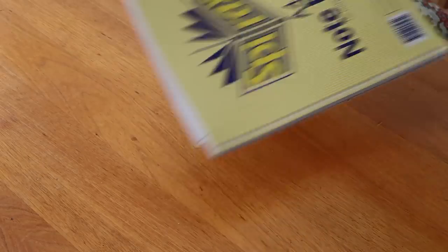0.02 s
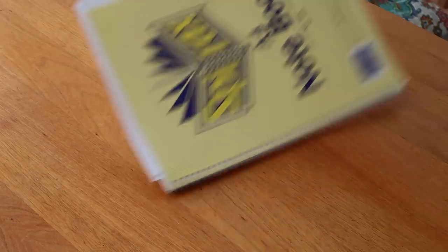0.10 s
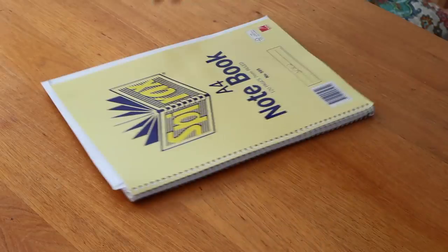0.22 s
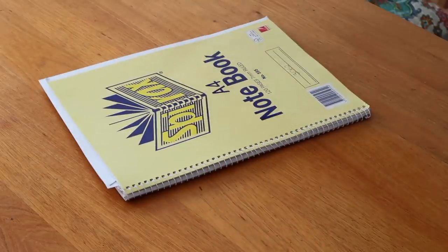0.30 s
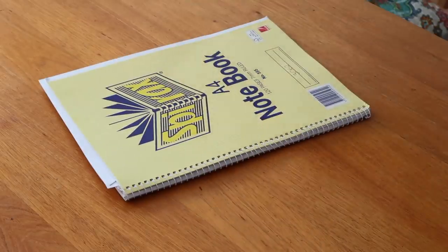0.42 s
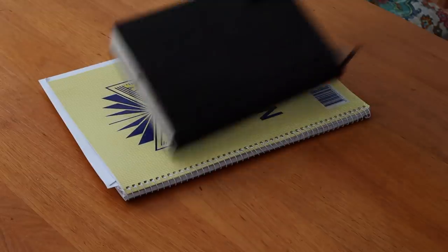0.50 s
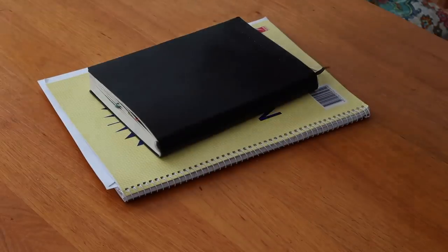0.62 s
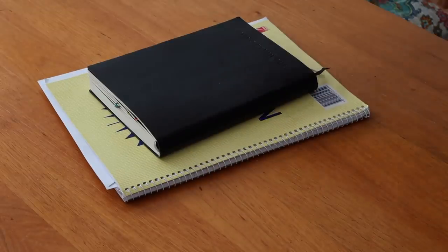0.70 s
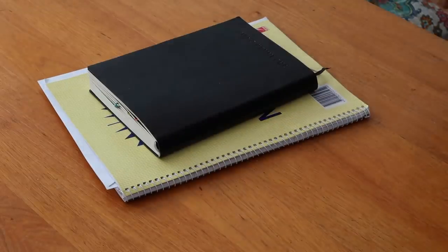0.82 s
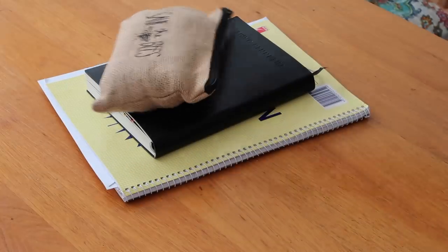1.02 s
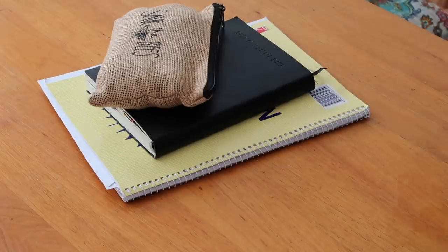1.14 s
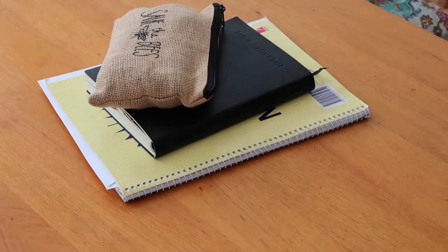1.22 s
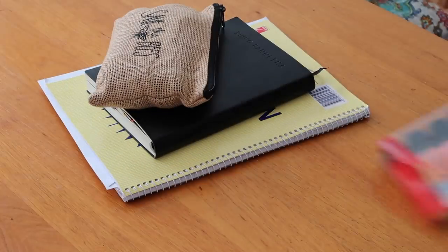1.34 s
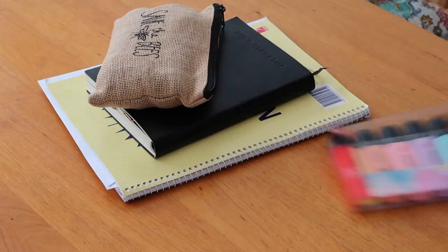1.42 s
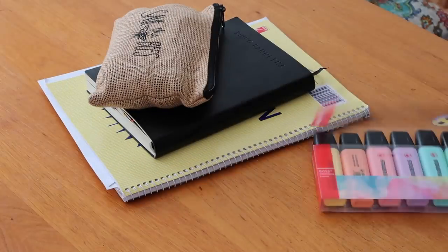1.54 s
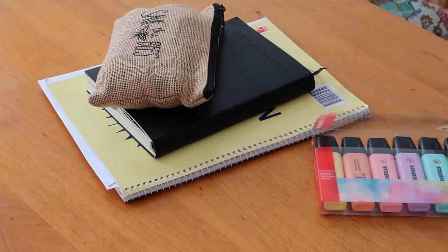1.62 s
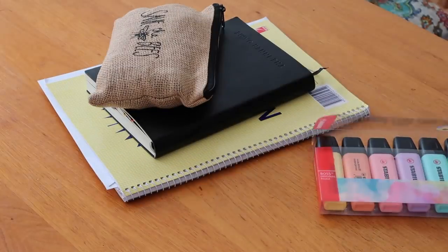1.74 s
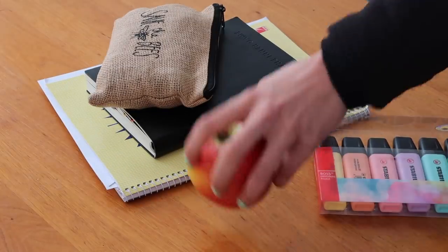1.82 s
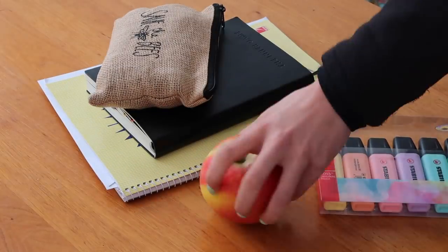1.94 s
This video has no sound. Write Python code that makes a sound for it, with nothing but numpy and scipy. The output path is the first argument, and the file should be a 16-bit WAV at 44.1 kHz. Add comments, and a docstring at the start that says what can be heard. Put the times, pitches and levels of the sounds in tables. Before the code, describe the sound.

A notebook slaps, a hard book thuds, a pencil case rattles and plastic markers clatter on wood

```python
"""Over faint hush and a low hum, a hand rustles, pages flutter and a notebook slaps a wooden table.
A hard-cover book, a cloth pencil case and a plastic pack of markers land next, in a bare, lively room.
Contacts are clicks and noise coloured by the object; knocks and the table top are fading sine waves.
Each landing is its own shot: a hard cut ends its echo, made of sparse clicks that die away.
A close pair of microphone ports hears it nearly mono in the bass and wide in the treble."""
import sys
import numpy as np
from scipy import signal
from scipy.fft import rfft, irfft
from scipy.io import wavfile

SR = 44100
rng = np.random.default_rng(int(sys.argv[2]) if len(sys.argv) > 2 else 0)


def to_wav(s):
    """Save 16-bit WAV."""
    ch = np.atleast_2d(s).T  # columns
    pcm = np.round(np.clip(ch, -1, 1) * 32767)  # PCM
    wavfile.write(sys.argv[1], SR, pcm.astype(np.int16))


N = 85995
TIME = np.arange(N) / SR  # seconds

# In every contact table t is the moment the rise ends and the fall begins.
# Each object's sound function returns its direct sound and its level into the room (dB).

# Fluttering pages, then the swell that leads into the slap: t/s, level/dB, rise/s, fall by 60 dB/s
PAGE_FLUTTER = [(.183, -38, 0.0068, 0.092), (.200, -22.5, 0.036, 0.084), (.222, -25.5, .005, 0.051),
                (.272, -19.5, 0.011, 0.023)]
# Colour of the pages: f/Hz, relative level/dB
PAGE_COLOUR = [(59, -30), (100, -22), (438, -1.5), (668, -9.5), (1430, -12), (1660, -15), (3120, -14.5),
               (3540, -19), (4660, -25), (15500, -50.5)]


def notebook_pages():
    """Loose sheets brush each other in soft, grainy bursts, and a duller swell leads into the slap."""
    return contacts(PAGE_FLUTTER, PAGE_COLOUR), -2.5


# Notebook hitting the table: t/s, level/dB, rise/s, fall by 60 dB/s
NOTEBOOK_SLAP = [(.275, -19, 0.0048, 0.06), (.2775, -11, 0.0026, 0.017), (.290, -13.5, 0.0093, 0.073)]
# Colour of the slap: f/Hz, relative level/dB
SLAP_COLOUR = [(200, -40), (450, -9.5), (850, -12.5), (1300, -6.5), (1800, -1.5), (2800, -12.5),
               (5500, -18), (8000, -23.5), (15500, -47.5)]


def notebook_slap():
    """The flat notebook meets the wood in quick bursts, strongest in the middle pitches."""
    return contacts(NOTEBOOK_SLAP, SLAP_COLOUR), -4


# Hard cover touching down: t/s, level/dB, rise/s, fall by 60 dB/s
COVER_TAPS = [(.5945, -28, 0.003, 0.024), (.598, -14.5, 0.00059, 0.038), (.608, -18, 0.009, 0.13),
              (.636, -20, 0.0068, 0.088)]
# Colour of the cover: f/Hz, relative level/dB
COVER_COLOUR = [(200, -25), (350, 1), (750, 6), (1500, -3.5), (3500, -11.5), (5000, -16.5), (6500, -28),
                (12700, -35.5), (15500, -49)]


def book_cover():
    """The stiff cover taps the table several times with a boxy sound."""
    return contacts(COVER_TAPS, COVER_COLOUR), -10


# Pencils rattling in the case: t/s, level/dB, rise/s, fall by 60 dB/s
PENCIL_RATTLE = [(.995, -17, 0.0081, .04), (1.001, -12, 0.0026, 0.035), (1.010, -10.5, 0.00069, 0.07),
                 (1.013, -11.5, 0.00077, 0.052), (1.043, -20.5, 0.0024, 0.12), (1.183, -29, 0.001, 0.13)]
# Colour of the pencils: f/Hz, relative level/dB
PENCIL_COLOUR = [(150, -50.5), (250, -6.5), (353, -23.5), (450, -3.5), (516, -17), (658, -15.5),
                 (978, -22.5), (1220, -15.5), (2360, -6.5), (13000, -30), (15500, -39)]


def pencil_rattle():
    """Pencils inside the cloth knock together in overlapping bursts."""
    return contacts(PENCIL_RATTLE, PENCIL_COLOUR), -4.5


# Zip of the pencil case: t/s, level/dB, rise/s, fall by 60 dB/s
ZIP_TICK = [(1.009, -12, 0.00047, 0.0084)]
# Colour of the zip: f/Hz, relative level/dB
ZIP_COLOUR = [(3000, -15), (5000, 4), (7000, -14), (10000, 3), (12500, -6), (15500, -29)]


def zip_tick():
    """The small zip gives one very short, bright tick."""
    return contacts(ZIP_TICK, ZIP_COLOUR), -3


# Edge of the marker pack: t/s, level/dB, rise/s, fall by 60 dB/s
PACK_EDGE = [(1.3885, -15.5, 0.00028, 0.062), (1.406, -19.5, .010, 0.16), (1.510, -27, 0.12, 0.068)]
# Colour of the edge: f/Hz, relative level/dB
EDGE_COLOUR = [(200, -44), (400, -10.5), (800, -6.5), (1300, -3), (1600, -2), (2300, -5.5), (3500, -19),
               (5500, -26), (12500, -48), (15500, -53)]


def pack_edge():
    """The plastic edge touches down first, with a sharp start."""
    return contacts(PACK_EDGE, EDGE_COLOUR), -3


# Pack landing flat: t/s, level/dB, rise/s, fall by 60 dB/s
PACK_FLAT = [(1.523, -10.5, 0.0019, 0.033), (1.535, -16.5, 0.0047, 0.12), (1.555, -16.5, 0.0049, 0.018)]
# Colour of the flat side: f/Hz, relative level/dB
FLAT_COLOUR = [(120, -36), (300, -6), (480, -1), (700, -0.5), (900, -9.5), (1300, -10), (2700, -21),
               (5000, -27), (9000, -66)]


def pack_flat():
    """The broad side of the pack lands with a duller sound than its edge."""
    return contacts(PACK_FLAT, FLAT_COLOUR), 0


# Markers rattling in the pack: t/s, level/dB, rise/s, fall by 60 dB/s
MARKER_RATTLE = [(1.515, -17.5, 0.0085, 0.033), (1.526, -15.5, 0.0013, 0.04), (1.576, -19, 0.032, 0.053),
                 (1.615, -28.5, 0.0097, 0.11), (1.80, -44.5, 0.24, 0.14)]
# Colour of the markers: f/Hz, relative level/dB
MARKER_COLOUR = [(600, -0.5), (1500, -1.5), (2500, -1.5), (4000, -13), (5500, -16), (7000, -23.5),
                 (15000, -39)]


def marker_rattle():
    """Loose markers clatter against each other inside the plastic."""
    return contacts(MARKER_RATTLE, MARKER_COLOUR), -1


# Short pitched knocks: t/s, starting level/dB, f/Hz, fall by 60 dB/s
KNOCKS = [(.2765, 6, 2300, 0.0063), (0.2774, -10.5, 1143, 0.028), (0.279, -8.5, 5480, 0.0047),
          (.2770, -29, 7950, 0.0026), (0.599, -10, 885, 0.0074), (0.6345, -4.5, 1290, 0.0054),
          (0.999, -14, 1884, 0.013), (1.010, -7.5, 2453, 0.021), (1.178, -21.5, 2730, .03),
          (1.388, -3.5, 1550, 0.0059), (1.39, -19.5, 4700, 0.007), (1.5216, -4, 4150, 0.0022),
          (1.5212, -10, 5100, 0.0051), (1.5206, -11, 5830, 0.0069), (1.522, -7, 605, 0.04),
          (1.526, -6, 873, 0.018)]


def knocks():
    """A struck cover, pencil or plastic wall rings briefly as a fading sine wave."""
    rise_s = 0.00017
    sound = np.zeros(N)
    for start, level_db, hz, t60 in KNOCKS:
        age = np.maximum(TIME - start, 0)
        loudness = gain_of(level_db - 60 * age / t60) * (1 - np.exp(-age / rise_s))
        sound -= loudness * np.sin(2 * np.pi * hz * age)
    return sound, -10


# Weight landing on the table top: t/s, level/dB, contact time/s
PUSHES = [(.200, -22, 0.0028), (0.282, -24, 0.0061), (.598, -14, 0.0032), (0.606, -12.5, 0.0014),
          (.615, -12.5, 0.0061), (.638, 1, 0.0034), (0.647, -9.5, 0.0025), (.6485, -12.5, 0.0025),
          (0.6517, -13, 0.0034), (.995, -15, 0.0015), (1.024, -15, 0.0035), (1.524, -19.5, 0.001),
          (1.571, -21.5, 0.0027)]
# Ringing modes of the table: f/Hz, relative level/dB, fall by 60 dB/s
TABLE_MODES = [(113, 4, 0.28), (264, -7.5, 0.35), (420, 0, 0.57), (448, 8.5, 0.21), (564, -33, 0.22),
               (620, -26, 0.47), (716, -29, 0.54), (759, -32, 0.54), (131.9, -6.5, 0.33),
               (222, -25.5, 0.21)]


def table_top():
    """A smooth force pulse gives a low pressure swing and rings the table's modes."""
    ring_db = -17
    force, swing = np.zeros(N), np.zeros(N)
    for start, level_db, contact_s in PUSHES:
        u = (TIME - start) / (contact_s / 2)
        pulse = gain_of(level_db) * np.exp(-2 * u ** 2)
        force += pulse / (contact_s * SR / 2)  # a longer push is spread thinner
        swing += pulse * (4 * u ** 2 - 1)  # the curvature of the force pulse
    age = np.arange(SR // 2) / SR
    ring = np.zeros(len(age))
    for hz, level_db, t60 in TABLE_MODES:
        ring += gain_of(level_db - 60 * age / t60) * np.sin(2 * np.pi * hz * age)
    return swing + gain_of(ring_db) * signal.oaconvolve(force, ring)[:N], -8


# Rustling hand: t/s, level/dB, rise/s, fall by 60 dB/s
HAND_RUSTLE = [(.137, -41.5, .001, 0.32), (.801, -44, 0.0042, 0.13), (.932, -46, 0.003, 0.2),
               (.961, -35.5, 0.0076, 0.05), (1.336, -34.5, 0.00084, 0.11), (1.878, -49, 0.0021, 0.064)]
# Colour of the rustle: f/Hz, relative level/dB
RUSTLE_COLOUR = [(400, -25), (900, -1.5), (1500, 2), (2500, 0.5), (3500, -9), (7000, -22.5), (15500, -47)]


def hand_rustle():
    """A moving hand makes faint grainy rubs around the landings."""
    return contacts(HAND_RUSTLE, RUSTLE_COLOUR), 0


# How long the room's echo lasts: f/Hz, fall by 60 dB/s
ROOM = [(100, 0.53), (300, 0.51), (800, 0.48), (2000, .52), (5000, 0.54), (9000, 0.36), (13000, 0.18)]


def room_tail():
    """Sparse clicks of random sign stand for echoes, each band dying at its own speed; energy 1."""
    first_echo_s, build_s = 0.0049, 0.0027
    taps = np.zeros(SR)
    at = np.arange(0, SR - 16, 16)  # one click in every 16 samples
    taps[at + rng.integers(0, 16, len(at))] = rng.choice([-1., 1.], len(at))
    hz, t, bands = signal.stft(taps, SR, nperseg=512)
    fall_db = -60 * t / read(ROOM, hz)[:, None]
    tail = signal.istft(bands * gain_of(fall_db), SR, nperseg=512)[1]
    tail = tail * np.clip((np.arange(len(tail)) / SR - first_echo_s) / build_s, 0, 1)
    return tail / np.linalg.norm(tail)


# Stereo width, side (left-right difference) against mid (their sum): f/Hz, level/dB
WIDTH = [(60, -42), (110, -42), (200, -23), (380, -21.5), (700, -23), (1290, -17.5), (2380, -13.5),
         (4400, -3.5), (8120, 4.5), (15000, 13)]


def stereo_side(direct, room_side):
    """The two ports differ little in the bass and much in the treble."""
    direct_width_db = -6.5
    turned = signal.hilbert(direct).imag  # a quarter cycle out of step with the mid
    return shaped(room_side + gain_of(direct_width_db) * turned, WIDTH)


# Colour of the hush in the mid: f/Hz, relative level/dB
HUSH_MID = [(47, -108), (80, -3.5), (104, -3.5), (294, -12), (487, -13), (709, -18), (809, -22), (965, -14),
            (11100, -42), (15500, -82)]
# Colour of the hush in the side: f/Hz, relative level/dB
HUSH_SIDE = [(24, -53), (40, -23), (377, -6), (577, -13), (1130, -14), (3300, -18), (3560, -17),
             (12700, -27), (15500, -34)]


def hush():
    """Steady room noise and a wavering low hum, as mid and side before each shot's own lift."""
    mid_db, side_db = -49, -57
    hum_db, hum_hz, hum_width_hz = -45.5, 49, 10
    hum_steady = 3.8  # the steady part of the hum against each wavering part
    mid, side = rng.standard_normal((2, N))
    r = np.exp(-np.pi * hum_width_hz / SR)
    slow = signal.lfilter([1 - r], [1, -r], rng.standard_normal((2, N + SR)))
    a, b = slow[:, SR:]  # skip the second in which the filter settles
    waver = hum_steady + evened(a) + 1j * evened(b)
    hum = evened((waver * np.exp(2j * np.pi * hum_hz * TIME)).real)
    return np.array([gain_of(mid_db) * evened(shaped(mid, HUSH_MID)) + gain_of(hum_db) * hum,
                     gain_of(side_db) * evened(shaped(side, HUSH_SIDE))])


def contacts(rows, colour):
    """Each contact is noise and a burst of tiny uneven clicks that ring the object's colour."""
    grains_per_s, spread_db, most_db = 3500, 2.5, 6
    power = np.zeros(N)
    for peak, level_db, rise, fall in rows:
        u = TIME - peak
        falling = gain_of(2 * (level_db - 60 * np.maximum(u, 0) / fall))
        power += falling * np.clip(1 + u / rise, 0, 1) ** 4
    size = gain_of(np.minimum(spread_db * rng.exponential(1, N), most_db))
    size = size * (rng.random(N) < grains_per_s / SR)
    grit = evened(rng.standard_normal(N)) + evened(size * rng.choice([-1., 1.], N))
    return signal.oaconvolve(np.sqrt(power / 2) * grit, causal(colour))[:N]


def gain_of(db):
    """Turn decibels into a multiplier."""
    return 10 ** (np.asarray(db) / 20)


def evened(x):
    """Scale a sound to an average (RMS) level of 1."""
    return x / np.sqrt(np.mean(x ** 2) + 1e-20)


def read(points, hz):
    """Read a table between its points, along a logarithmic pitch scale."""
    f, value = np.transpose(points)
    return np.interp(np.log(hz + 1), np.log(f + 1), value)


def causal(points, size=4096):
    """Minimum-phase filter of energy 1, falling away below the first point."""
    hz = abs(np.fft.fftfreq(size, 1 / SR))
    points = [(6.7, points[0][1] - 30)] + list(points)
    log_gain = np.log(gain_of(read(points, hz)))
    taps = np.fft.ifft(np.exp(np.conj(signal.hilbert(log_gain)))).real[:size // 2]
    return taps / np.linalg.norm(taps)


def shaped(x, points):
    """Colour a sound from a dB table without shifting it in time (zero phase)."""
    return irfft(rfft(x) * gain_of(read(points, np.fft.rfftfreq(len(x), 1 / SR))), len(x))


# Edges of the shots, each one starting where the last ends: t/s
CUTS = [0, .495, .897, 1.335, 1.853, 2]
# Lift of the hush and hum in each shot: level/dB
SHOT_HUSH = [0.47, 1.4, 0, 4.6, 2.7]


def scene():
    """Every shot plays its objects through the room and is cut off at its end."""
    parts = [notebook_pages(), notebook_slap(), book_cover(), pencil_rattle(), pack_edge(), pack_flat(),
             marker_rattle(), zip_tick(), hand_rustle(), knocks(), table_top()]
    direct = sum(sound for sound, room_db in parts)
    send = sum(sound * gain_of(room_db) for sound, room_db in parts)
    air = hush()
    out = np.zeros((2, N))
    for start, end, hush_db in zip(CUTS, CUTS[1:], SHOT_HUSH):
        shot = (TIME >= start) & (TIME < end)
        # two separate echo patterns, one for mid and one for side
        room_mid, room_side = (signal.fftconvolve(send * shot, room_tail())[:N] for _ in range(2))
        side = stereo_side(direct * shot, room_side)
        out += shot * (np.array([room_mid + direct, side]) + gain_of(hush_db) * air)
    mid, side = out
    return np.array([mid + side, mid - side])


def record(dry):
    """The microphone loses the deepest bass, peaks are clipped at full scale, then the top is cut."""
    bass_cut_hz, top_hz = 50, 15900
    bass_cut = signal.butter(2, bass_cut_hz, "high", fs=SR, output="sos")
    thin = signal.sosfilt(bass_cut, dry)
    band_limit = signal.firwin(1023, top_hz, window=("kaiser", 10), fs=SR)
    return signal.oaconvolve(np.clip(thin, -1, 1), band_limit[None], "same")


dry = scene()
out = record(dry)
to_wav(out)
```